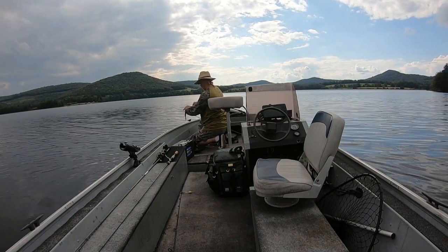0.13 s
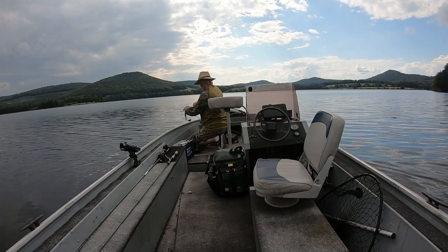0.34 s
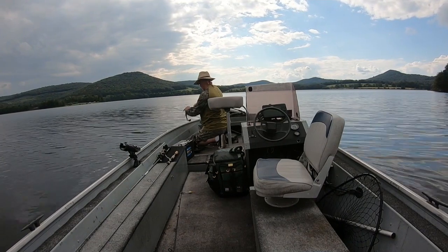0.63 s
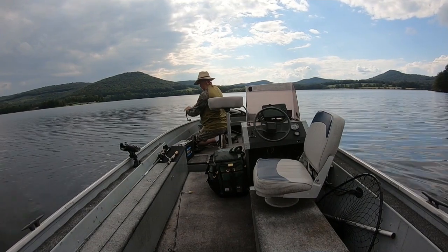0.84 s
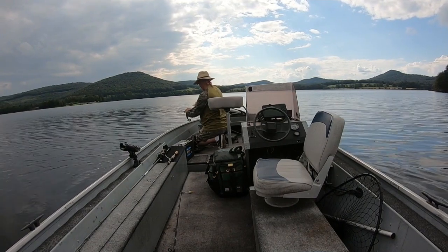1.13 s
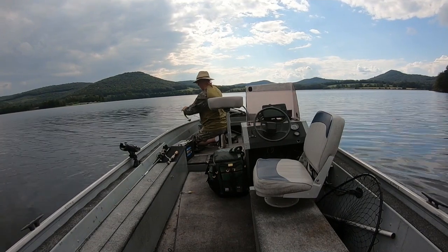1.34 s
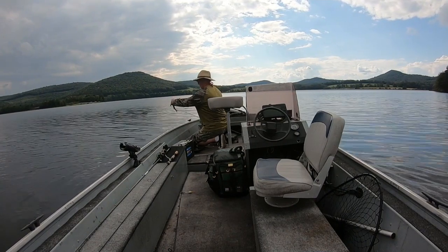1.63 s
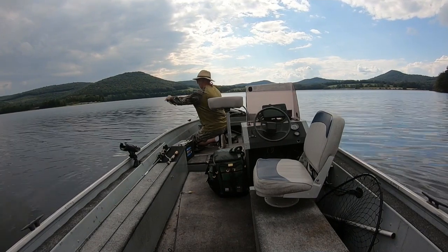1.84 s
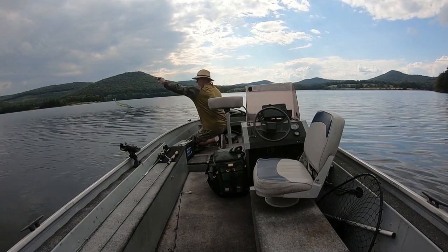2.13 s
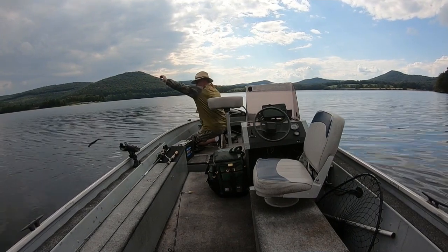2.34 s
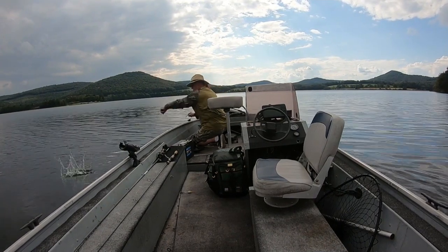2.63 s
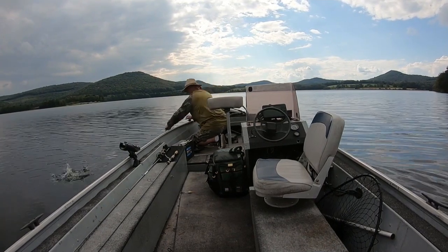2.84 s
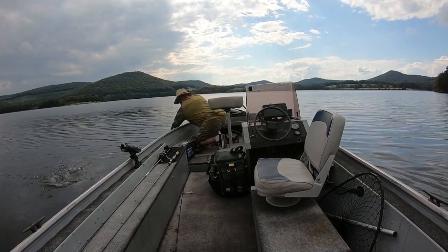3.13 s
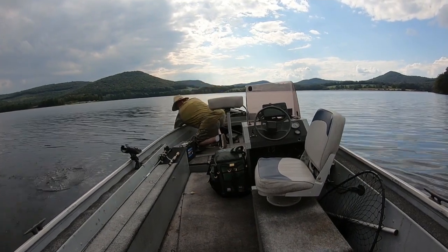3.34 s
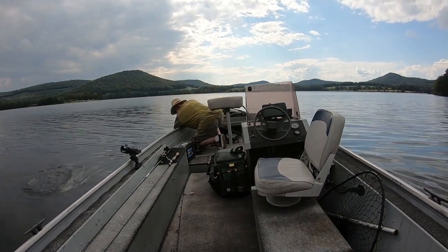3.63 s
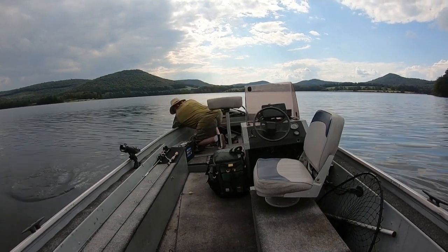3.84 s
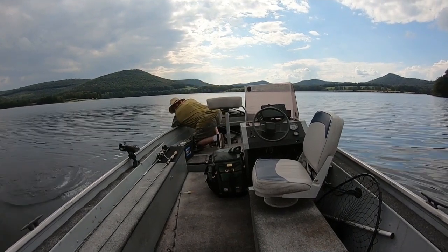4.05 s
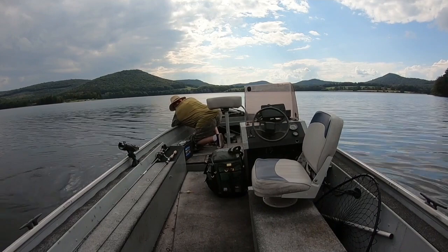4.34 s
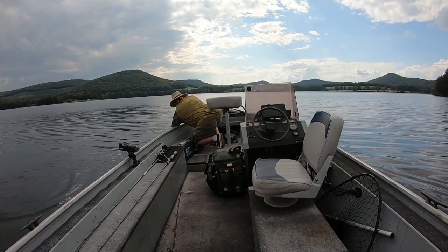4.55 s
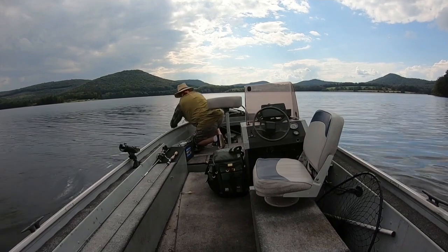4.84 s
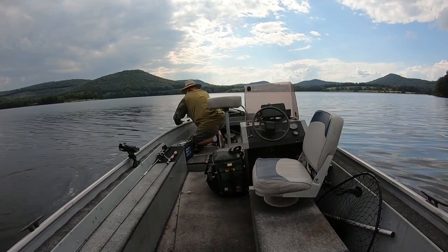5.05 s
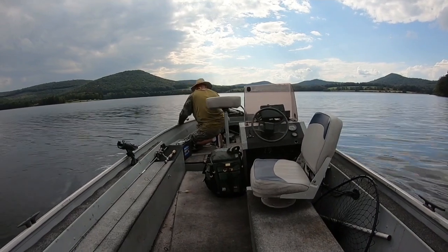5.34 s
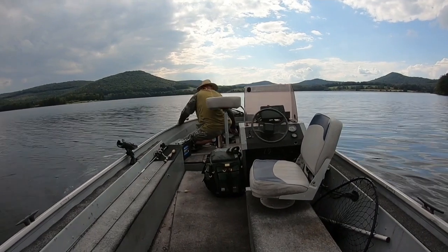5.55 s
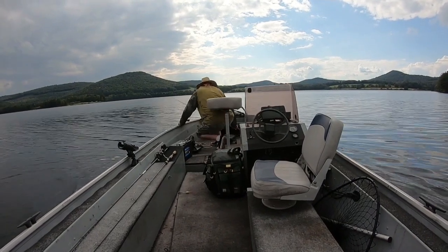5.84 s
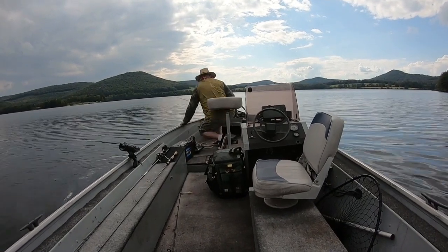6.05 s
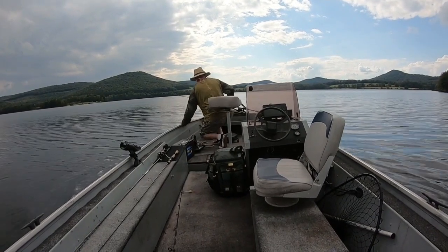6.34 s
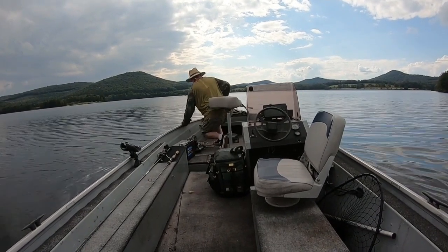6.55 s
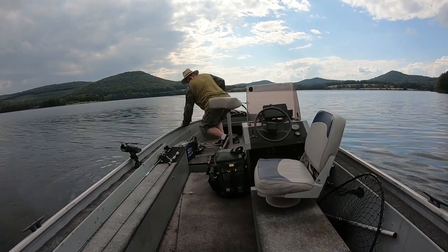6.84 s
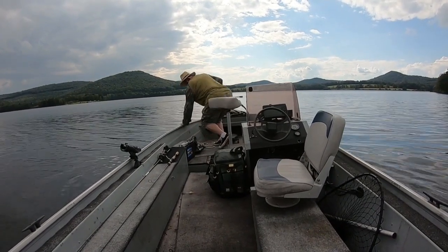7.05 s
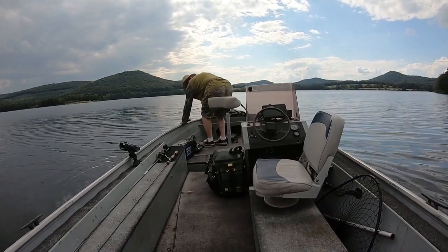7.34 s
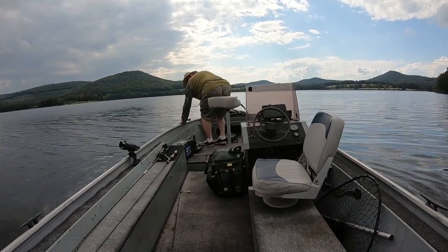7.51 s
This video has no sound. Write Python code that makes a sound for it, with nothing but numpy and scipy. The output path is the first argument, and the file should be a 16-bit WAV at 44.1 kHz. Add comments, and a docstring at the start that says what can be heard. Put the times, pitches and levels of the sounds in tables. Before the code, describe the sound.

A fish splashes back into a calm lake beside a small metal boat, then hands swish, feet thud, tackle clinks and an engine drones closer.

```python
"""On a calm lake, in a small metal boat, a fish is thrown back: sharp cracks, ringing bubbles and hissing spray.
Hands are rinsed over the side in gliding bubbles, then feet and tackle thud, scrape and clink as damped tones
and rough noise. Ripples ring the hull side and lap as shaped noise, and a breeze buffets the microphone ports.
A far hum of one tone fades, an engine drones nearer as a stack of tones, and shore insects are two noise bands."""
import sys
import numpy as np
from scipy import signal
from scipy.fft import rfft, irfft, next_fast_len
from scipy.io import wavfile
from scipy.ndimage import map_coordinates

SR = 44100
rng = np.random.default_rng(int(sys.argv[2]) if len(sys.argv) > 2 else 0)


def unload_audio(sound):
    """Save the sound as a 16-bit wav file, at the path given as the first command line argument."""
    columns = np.transpose(np.atleast_2d(sound))
    # keep every value between -1 and 1, then stretch to whole-number steps
    steps = np.round(np.clip(columns, -1, 1) * 32767)
    wavfile.write(sys.argv[1], SR, steps.astype(np.int16))


N = 338688
T = np.arange(N) / SR  # the time of every sample, in seconds


def amp(db):
    """Turn decibels into a plain multiplier."""
    return np.exp(np.asarray(db) * np.log(10) / 20)


def unit(x):
    """Scale a sound to an rms of 1."""
    return x / np.sqrt(np.mean(x ** 2) + 1e-20)


def along(points, hz):
    """Read a curve of (pitch_hz, value) points on a log pitch axis."""
    pitch_hz, value = np.transpose(points)
    return np.interp(np.log(hz + 1), np.log(pitch_hz + 1), value)


def curves(rows):
    """Give one value per sample for each column after the time."""
    time_s, *columns = np.transpose(rows)
    return [np.interp(T, time_s, column) for column in columns]


def wobble(rate):
    """A smooth random curve with the given number of random points a second."""
    points = rng.standard_normal(int(N * rate / SR) + 4)
    coarse_time = T[::32]
    return np.interp(T, coarse_time, map_coordinates(points, [coarse_time * rate]))


def filtered(x, response):
    """Multiply the spectrum of x by a response, which may shift phase too."""
    size = next_fast_len(N + SR // 2)  # spare room so that the end does not wrap to the start
    return irfft(rfft(x, size) * response(np.fft.rfftfreq(size, 1 / SR)), size)[..., :N]


def coloured(x, spectrum):
    """Shape x with a spectrum that is silent beyond both ends, rms 1."""
    lowest_hz, highest_hz = .7 * spectrum[0][0], 1.3 * spectrum[-1][0]
    inside = lambda hz: (hz > lowest_hz) & (hz < highest_hz)
    return unit(filtered(x, lambda hz: amp(along(spectrum, hz)) * inside(hz)))


def band(x, lo_hz, hi_hz):
    """A steep band-pass that never sounds ahead of its input, rms 1."""
    sos = signal.butter(3, [lo_hz, min(hi_hz, 18000)], "band", fs=SR, output="sos")
    return unit(signal.sosfilt(sos, x))


def pair(alike):
    """Two white noises, left and right; alike is their correlation."""
    a, b = rng.standard_normal((2, N))
    turn = np.arccos(np.clip(alike, -1, 1)) / 2
    shared, different = np.cos(turn) * a, np.sin(turn) * b
    return np.array([shared + different, shared - different])


def panned(x, pan_db):
    """Place a sound: pan_db is how much louder the left is than the right."""
    return np.array([x * amp(pan_db / 2), x * amp(-pan_db / 2)])


def add(out, start_s, sound):
    """Mix a sound in at its start time, cut at the end of the scene."""
    part = out[:, round(start_s * SR):][:, :sound.shape[1]]
    part += sound[:, :part.shape[1]]


def bubble(t, hz, t60, rise, attack):
    """A tone that swells in, loses 60 dB per t60 and can glide, as a shrinking air pocket climbs in pitch."""
    tone = np.sin(2 * np.pi * hz * t * (1 + rise * t / t60))
    return tone * amp(-60 * t / t60) * (1 - np.exp(-t / attack))


def drops(count, size, hz, spread, cycles, rise, size_db):
    """A steady rain of bubbles of mixed pitch and size, each size samples long, rms 1."""
    start, t = rng.random((count, 1)), np.arange(size) / SR
    pitch = np.clip(hz * np.exp(spread * rng.standard_normal((count, 1))), 400, 14000)
    loudness = amp(size_db * np.minimum(rng.exponential(size=(count, 1)), 3))
    grain = loudness * bubble(t, pitch, cycles / pitch, rise, 1.2 / pitch)
    grain = grain * np.cos(np.pi / 2 * t / t[-1])  # fade to silence at the end of each drop
    where = (start * N).astype(int) + np.arange(size)
    return unit(np.bincount(where.ravel(), grain.ravel(), N)[:N])


def swells(start, rise, hold, fall, *levels_db):
    """Events that gain 20 dB per rise time, hold, and lose 20 dB per fall time; one summed gain per level column."""
    late = T - start[:, None]
    before, after = -late / np.c_[rise], (late - np.c_[hold]) / np.c_[fall]
    shape = amp(-20 * np.maximum(np.maximum(before, after), 0))
    return amp(levels_db) @ shape


# Small sharp contacts of water and tackle: start_s, level_db, pitch_hz, edge_db (bright edge), pan_db (+ is left)
CONTACTS = [(1.3753, -51.5, 1370, -32, -11), (1.9608, -44, 1240, -25, -7), (1.9883, -43, 1900, -18, -4),
            (2.564, -24, 1900, -10, 2.5), (2.5714, -28.5, 3150, -5.5, -1), (2.5764, -32, 2340, -21, -2),
            (2.591, -23.5, 1740, -40, 3), (2.6024, -36.5, 1120, -35, 9), (2.6787, -35, 1640, -21, 5),
            (2.7075, -28.5, 3220, -26, 2), (2.7736, -50, 3470, -21, 4), (2.847, -52, 3560, -14, 0),
            (2.9097, -46, 3150, -30, 1), (2.9331, -39, 2970, -29, 4), (2.9594, -40, 2770, -9, 0.5),
            (2.993, -49, 1270, -14, 13), (3.005, -43, 2320, -26, 3), (3.0339, -51, 2520, -26, 7),
            (3.0843, -43, 3590, -25, 2), (3.1242, -41, 1850, -10, -2), (3.6211, -45.5, 2080, -10, -6),
            (3.7044, -48, 1240, -29.5, -3), (3.919, -46, 1230, -27, -5), (3.9857, -43, 1280, -33, -6),
            (3.897, -50, 2210, -35, -8), (4.0217, -44, 2120, -37, -1), (4.1983, -43.5, 1390, -35, -5),
            (4.2836, -47, 1250, -23, 10), (4.3295, -34, 1430, -23, 2.5), (4.3853, -45.5, 1220, -35, -11),
            (4.736, -39, 1590, -38, -4), (4.752, -50, 1500, -38, -3), (4.771, -43, 1500, -40, -5),
            (4.7925, -31, 2130, -21, -3), (5.2608, -47, 1750, -31, -1), (5.2773, -42.5, 2120, -30, -2),
            (5.3382, -44.5, 1900, -22, -9), (5.4983, -37, 1790, -40, -9), (5.5632, -51, 3180, -27, -7),
            (5.9483, -45, 4340, -11, -1), (5.9757, -43, 1780, -14, -2.5), (6.1488, -49, 3400, -33, -2),
            (6.2157, -38, 1370, -21, -2), (6.2456, -31.5, 1660, -16, -3.5), (6.4264, -53, 4280, -28, -1),
            (6.4761, -47.5, 3520, -40, -2), (6.563, -44.5, 1700, -31, -1), (7.436, -43, 1400, -14, -16),
            (7.4673, -43, 1460, -13, -1), (7.613, -43, 1570, -40, -4)]
TICK_T60_S = 0.02
LONGER_DB, LOUD_DB = 0.26, -26.5  # ring time gained, in dB, for each dB that a tick lies under LOUD_DB


def ticks():
    """Each small contact is a noisy crack, a short ring and a bright edge that differs at the two ports."""
    out, t = np.zeros((2, N)), np.arange(SR // 16) / SR
    for start_s, level_db, hz, edge_db, pan_db in CONTACTS:
        t60 = TICK_T60_S * amp(LONGER_DB * max(LOUD_DB - level_db, 0))
        burst = rng.standard_normal((3, len(t)))
        fast, slow = amp(-120 * t / t60), amp(-30 * t / t60)
        ring = bubble(t, hz, t60, 0.099, 0.00023)
        crack = band(burst[0], 0.36 * hz, 1.66 * hz) * (fast + 0.33 * slow)
        edge = band(burst[1] + 2.7 * burst[1:], 4500, 9600) * (fast + 0.1 * slow)
        edge = amp(edge_db) * edge * amp([[-1.5], [1.5]])
        add(out, start_s, panned(amp(level_db), pan_db)[:, None] * (0.42 * ring + 0.33 * crack + edge))
    return out


# Trapped pockets of air: start_s, level_db, pitch_hz, t60_s (time to fade 60 dB), pan_db (+ is left)
AIR_POCKETS = [(1.962, -48.5, 462, 0.12, -4), (2.564, -34, 620, 0.02, 3), (2.6495, -24.5, 547, 0.052, 3),
               (2.657, -29.5, 521, 0.05, 2), (2.68, -26, 473, 0.03, 1), (2.803, -38, 675, 0.034, 2),
               (2.817, -36.5, 308, 0.038, -1.0), (2.935, -48.5, 780, 0.06, -1), (2.96, -39, 920, 0.038, 6),
               (2.993, -40, 770, 0.025, 6), (3.772, -45, 480, 0.043, 4), (3.972, -43, 396, 0.11, 2.5),
               (4.034, -46.5, 692, 0.08, 4), (4.063, -47, 468, 0.11, -2), (4.305, -52, 704, 0.054, -3),
               (4.384, -47, 450, 0.038, -6), (4.587, -38.5, 362, 0.082, -3.5),
               (4.665, -52.5, 710, 0.033, -3), (4.74, -44.5, 454, 0.19, -2.5), (5.263, -44, 430, 0.1, -2),
               (5.573, -41.5, 452, 0.074, -7), (5.596, -36, 357.5, 0.12, 1.0), (5.669, -44, 376, 0.064, -3),
               (5.924, -44, 469, 0.18, -1.5), (6.248, -34.5, 463, 0.023, -1.5),
               (6.547, -45, 617, 0.19, -1.5), (6.569, -45, 377, 0.11, 0), (6.619, -40.5, 359, 0.1, -3)]


def glugs():
    """Each trapped pocket of air rings with two neighbours, the lower one swelling softly, and a dull slap."""
    out, t = np.zeros((2, N)), np.arange(SR // 8) / SR
    chances = rng.standard_normal((len(AIR_POCKETS), 2))
    for (start_s, level_db, hz, t60, pan_db), chance in zip(AIR_POCKETS, chances):
        main = 1.27 * bubble(t, hz, t60, 0.13, 0.00066)
        lower = 1.27 * bubble(t, hz * (.76 + 0.035 * chance[0]), t60, 0.17, 0.014)
        upper = 0.42 * bubble(t, hz * (1.1 + 0.035 * chance[1]), 0.82 * t60, 0.12, 0.0015)
        slap = band(rng.standard_normal(len(t)), 180, 1.43 * hz)
        slap = slap * amp(-60 * t / (1.95 * t60)) * (1 - np.exp(-t / 0.00048))
        add(out, start_s, panned(amp(level_db) * (main + lower + upper + 0.29 * slap), pan_db))
    return out


# Rising bubbles: start_s, level_db, start_pitch_hz, t60_s, pitch_rise (share of the start pitch)
RISING_BUBBLES = [(2.755, -46, 1090, 0.045, 0.32), (3.2, -47, 1610, 0.065, 1.2),
                  (3.78, -46, 640, 0.066, 1.2), (4.241, -45.5, 1450, 0.053, 0.93),
                  (5.286, -43.5, 1430, 0.035, 1.6), (5.589, -47, 1050, 0.067, 0.8),
                  (5.666, -40, 550, 0.056, 2.16)]


def rising_bubbles():
    """A rising bubble chirps upward in one pure gliding tone and is gone after half its t60."""
    out, t = np.zeros((2, N)), np.arange(SR // 8) / SR
    for start_s, level_db, hz, t60, rise in RISING_BUBBLES:
        fade = np.cos(np.pi / 2 * np.minimum(2 * t / t60, 1))
        add(out, start_s, panned(amp(level_db) * bubble(t, hz, t60, rise, 0.0025) * fade, 2.8))
    return out


# Showers of water: peak_s, rise_s and fall_s (per 20 dB), drops_db, mist_db
SHOWERS = [(2.565, 0.0069, 0.036, -54, -57), (2.68, 0.064, 0.031, -48.5, -55),
           (2.85, 0.31, 0.094, -59, -63.5), (2.915, 0.023, 0.18, -50, -53.5), (3.03, 0.12, 0.14, -65, -59),
           (3.095, 0.18, 0.23, -57.5, -59.5), (3.27, 0.09, 3.1, -80, -70)]
# Tone of fine mist and grit: pitch_hz, level_db (relative)
FINE_TONE = [(3000, -23), (5000, -17), (8000, -25), (10500, -16.5), (12000, -45), (14500, -19)]


def spray():
    """Thrown water rains back as crackling drops over a wet hiss, and a finer mist."""
    peak_s, rise, fall, *levels_db = np.transpose(SHOWERS)
    heavy, light = swells(peak_s, rise, 0, fall, *levels_db)
    crackle = drops(count=3200, size=250, hz=2940, spread=0.48, cycles=17, rise=0.33, size_db=7)
    wet = 0.74 * crackle + 0.28 * band(pair(0.96), 2300, 4400)
    fine = np.array([drops(count=3000, size=60, hz=8700, spread=0.36, cycles=8.3, rise=0.13, size_db=4)
                     for port in "LR"])
    mist = 0.35 * fine + 0.41 * coloured(pair(.2), FINE_TONE)
    return heavy * wet + light * mist * amp([[-2.5], [2.5]])


# Stirred water: peak_s, rise_s and fall_s (per 20 dB), big_bubbles_db, small_bubbles_db
STIRS = [(3.02, 0.25, 0.55, -62, -63.5), (3.26, .3, 0.048, -61, -72), (3.8, 0.26, 0.062, -61.5, -74),
         (4.066, 0.42, 0.05, -62, -65), (4.3, 0.19, 0.12, -88, -59.5), (5.196, 0.0089, 0.073, -63, -93),
         (5.32, 0.046, 0.52, -67, -74)]
# Tone of rough noise, in stirred water and in scrapes: pitch_hz, level_db (relative)
COARSE_TONE = [(500, -1), (1000, -11.5), (1800, 8), (3000, -1.5), (5000, -13), (7000, -25)]


def gurgle():
    """Stirred water lets go of bubbles whose pitch glides up, the small ones mixed with rough noise."""
    peak_s, rise, fall, *levels_db = np.transpose(STIRS)
    deep, light = swells(peak_s, rise, 0, fall, *levels_db)
    big = drops(count=450, size=1300, hz=704, spread=0.3, cycles=33, rise=0.27, size_db=4)
    small = drops(count=2200, size=500, hz=1790, spread=0.306, cycles=27, rise=0.37, size_db=4.5)
    small = small + 0.76 * coloured(pair(0.47), COARSE_TONE)
    return (deep * big + light * small) * amp([[.8], [-.8]])


# Weight shifting on the floor: start_s, level_db, pitch_hz, t60_s
FLOOR_THUDS = [(2.797, -39, 163, 0.11), (4.738, -25, 81.9, 0.29), (4.768, -25.5, 56.5, 0.2),
               (5.389, -41, 68, 0.39), (5.951, -35, 92, 0.21), (6.044, -32, 70, 0.19),
               (6.247, -26.5, 54, 0.26), (6.29, -35.5, 81.6, 0.28), (6.439, -35.5, 76.3, 0.27),
               (6.499, -27.5, 73, 0.091), (7.104, -35.5, 62, 0.14)]


def thuds():
    """Weight shifts flex the floor: a soft low push with a higher panel mode."""
    out, t = np.zeros((2, N)), np.arange(SR // 2) / SR
    for start_s, level_db, hz, t60 in FLOOR_THUDS:
        push = bubble(t, hz, t60, -0.05, 0.0047)
        panel = 0.3 * bubble(t, 2.3 * hz, 0.56 * t60, 0, 0.0062)
        add(out, start_s, panned(amp(level_db) * (push + panel), 0))
    return out


# Shoes and cloth dragging: start_s (of the hold), hold_s, fall_s (per 20 dB), drag_db, fine_grit_db
DRAGS = [(1.956, 0.0089, 0.08, -63, -86), (2.1, .03, .02, -80, -74), (4.788, 0.073, .02, -56.5, -74),
         (5.962, 0.22, .1, -69.5, -73), (6.268, .01, 0.19, -64, -76), (6.566, 0.12, .02, -68, -100),
         (7.092, 0.069, .02, -64, -89), (7.43, 0.047, .035, -60.5, -70)]
SCRAPE_RISE_S = 0.035  # per 20 dB


def scrapes():
    """Shoes and cloth drag briefly over the floor: noise with a rough grain, coarse and fine."""
    start_s, hold, fall, *levels_db = np.transpose(DRAGS)
    drag, grit = swells(start_s, SCRAPE_RISE_S, hold, fall, *levels_db)
    grains = pair(1.0) * amp(1.3 * wobble(300))
    return (drag * coloured(grains, COARSE_TONE) + grit * coloured(grains, FINE_TONE)) * amp([[-1.5], [1.5]])


# Loose tackle touching metal: start_s, level_db, tilt_db (per octave; + is brighter)
TOUCHES = [(5.9489, -65, -3), (5.9768, -57, 4), (5.9944, -64, 8), (6.1479, -54.5, -1), (6.2457, -56, 7),
           (6.2961, -57, -1), (6.3076, -62, 10), (6.4263, -60, 4), (6.4844, -65, 4)]
# Ringing tones of the tackle: pitch_hz, level_db, t60_s
TACKLE_TONES = [(1840, 2.5, 0.069), (2570, -20, .04), (3570, 3, 0.05), (4530, -1, 0.034), (5050, -7, 0.057),
                (5100, -11, 0.041)]


def clinks():
    """Each touch rings the same small metal modes at new strengths."""
    out, t = np.zeros((2, N)), np.arange(SR // 8) / SR
    chances = rng.standard_normal((len(TOUCHES), len(TACKLE_TONES)))
    for (start_s, level_db, tilt_db), chance in zip(TOUCHES, chances):
        ring = 0
        for (hz, tone_db, t60), c in zip(TACKLE_TONES, chance):
            strength = amp(tone_db + 4.9 * c + tilt_db * np.log2(hz / 4500))
            ring = ring + strength * bubble(t, hz, t60, 0, 0.00044)
        add(out, start_s, panned(amp(level_db) * ring, -1.0))
    return out


# Ripples slapping the right side: start_s, level_db, best_pitch_hz (the pitch driven most)
RIPPLE_SLAPS = [(0.714, -39, 526), (1.374, -52.5, 700), (2.164, -36.5, 550), (5.2, -40, 626),
                (5.339, -33.5, 584), (5.498, -48.5, 530), (6.404, -37, 790), (7.488, -29, 840)]
# Ringing tones of the hull side: pitch_hz, level_db, t60_s
HULL_TONES = [(290, 13, 0.1), (477, 4, 0.042), (537, 1, 0.049), (623, -7, 0.098), (758, 8.5, 0.039),
              (875, 2, 0.03), (1100, -11, 0.042), (1280, -8, .03)]
REACH_DB, KNOCK_PAN_DB = 17.5, -11.5  # loss of a mode one octave from the best pitch; - is right


def knocks():
    """Each slap rings the hull side, most at the modes near its own pitch."""
    out, t = np.zeros((2, N)), np.arange(SR // 8) / SR
    chances = rng.standard_normal((len(RIPPLE_SLAPS), len(HULL_TONES)))
    for (start_s, level_db, best_hz), chance in zip(RIPPLE_SLAPS, chances):
        ring = 0
        for (hz, tone_db, t60), c in zip(HULL_TONES, chance):
            strength = amp(tone_db + 2.7 * c - REACH_DB * np.log2(hz / best_hz) ** 2)
            ring = ring + strength * bubble(t, hz * (1 + .02 * c), t60, 0, 0.0019)
        slap = band(rng.standard_normal(len(t)), 130, 1.65 * best_hz)
        slap = slap * amp(-60 * t / 0.069) * (1 - np.exp(-t / 0.0016))
        add(out, start_s, panned(amp(level_db) * (0.67 * ring + 0.24 * slap), KNOCK_PAN_DB))
    return out


def ports(left, right):
    """Two close ports hear the bass alike; higher up their difference is lifted and shifted."""
    lift = lambda hz: 1.5 * (1j * hz / 450) ** 2 / (1 + 1j * hz / 450) ** 2
    wide = filtered((left - right) / 2, lift)
    return (left + right) / 2 + np.array([wide, -wide])


# Echoes from the hull sides: delay_s, level_db
HULL_ECHOES = [(.0035, -20.5), (.007, -14.5), (.016, -15.5), (0.026, -22.5)]


def hull_echoes(near):
    """The hull sides send back a few fainter, later copies."""
    echo = lambda hz: 1 + sum(amp(db) * np.exp(-2j * np.pi * hz * delay_s) for delay_s, db in HULL_ECHOES)
    return filtered(near, echo)


# Water against the hull over time: time_s, boom_db, lapping_db
SWELL_LEVEL = [(0.0, -60, -55.5), (0.58, -62, -58.5), (1.09, -50.5, -56), (1.77, -63.5, -56.5),
               (2.27, -52.5, -55), (2.97, -56, -52), (3.31, -55.5, -54), (3.57, -46, -57.5),
               (4.45, -63.5, -56.5), (4.88, -52, -52.5), (5.24, -57.5, -54), (5.41, -55.5, -52.5),
               (5.88, -61, -52), (6.18, -54, -49.5), (6.91, -59.5, -53), (7.68, -54, -53)]
# Tone of the hull boom: pitch_hz, level_db (relative)
BOOM_TONE = [(32, -23), (55, -6.5), (89, 6), (101, 0), (124, -13), (135, -17), (180, -55), (300, -120)]
# Tone of the lapping: pitch_hz, level_db (relative)
LAPPING_TONE = [(74, -11), (125, -0.5), (157, 3.5), (204, -2.5), (308, -7.5), (348, -10), (457, -17.5),
                (490, -33.5), (800, -26), (1040, -71), (1760, -120)]


def lapping():
    """Ripples lap at the hull, which booms in lumps: two low noises of uneven level."""
    boom_db, lap_db = curves(SWELL_LEVEL)
    boom = amp(boom_db + 2.65 * wobble(13)) * coloured(pair(1.0), BOOM_TONE)
    laps = amp(lap_db + 2.64 * wobble(12)) * coloured(pair(0.95), LAPPING_TONE)
    return boom + laps


# Heaving of the boat over time: time_s, level_db
ROCKING_LEVEL = [(0.0, -53), (0.7, -62), (0.85, -77), (6.14, -68), (6.27, -40), (6.46, -42.5), (6.54, -65),
                 (7.42, -41), (7.68, -61)]
# Tone of the heaving: pitch_hz, level_db (relative)
HEAVE_TONE = [(8, -9.5), (14, 0), (20, 2), (26, -24)]


def rocking():
    """A rumble at the edge of hearing as the boat heaves, unlike at the two ports."""
    level_db, = curves(ROCKING_LEVEL)
    return amp(level_db) * coloured(pair(.4), HEAVE_TONE) * amp([[-3], [3]])


# Breeze over time: time_s, level_db
BREEZE_LEVEL = [(0.0, -42.5), (0.3, -59), (0.58, -61.5), (0.72, -54), (0.9, -72), (1.45, -62), (2.01, -75),
                (3.44, -59), (4.3, -78), (4.79, -54), (5.71, -64), (6.3, -51.5), (6.8, -67), (7.68, -58)]
# Tone of the buffeting: pitch_hz, level_db (relative)
BUFFET_TONE = [(22, -37), (33, -5), (42, -4.5), (58, -3.5), (75, -23)]
VEER_DB = (5, -6)  # the breeze swings from the left port to the right


def breeze():
    """Wind on the ports buffets them with deep, unsteady noise."""
    level_db, = curves(BREEZE_LEVEL)
    gusts = panned(amp(level_db + 4.2 * wobble(9.7)), np.linspace(*VEER_DB, N))
    return gusts * coloured(pair(0.97), BUFFET_TONE)


# Engine loudness over time: time_s, level_db
ENGINE_LEVEL = [(0, -88), (5, -69.5), (6.8, -59.5), (7.68, -57.5)]
# Tones of the engine: multiple (of the base pitch), level_db
ENGINE_TONES = [(2, -10), (3, -1.5), (4, -7), (5, -4.5), (6, -8), (7, -10.5), (8, -12)]
ENGINE_BASE_HZ, FLUTTER_DB = 76.8, 2.5


def engine():
    """A far engine draws nearer; each of its tones flutters on its own way through the air."""
    level_db, = curves(ENGINE_LEVEL)
    turns = 2 * np.pi * np.cumsum(ENGINE_BASE_HZ + 0.28 * wobble(3)) / SR
    drone = 0
    for multiple, tone_db in ENGINE_TONES:
        drone = drone + amp(tone_db + FLUTTER_DB * wobble(3.6)) * np.sin(multiple * turns)
    return amp(level_db) * drone


# Far hum over time: time_s, level_db
HUM_LEVEL = [(0.0, -52.5), (0.35, -67.5), (0.95, -57.5), (1.6, -52.5), (2.0, -66.5), (2.17, -54.5),
             (3.6, -61), (3.7, -84)]
HUM_START_HZ, HUM_SAG_HZ_PER_S = 258, 2.4


def hum():
    """A far, slightly unsteady tone that sags and fades."""
    level_db, = curves(HUM_LEVEL)
    hz = HUM_START_HZ - HUM_SAG_HZ_PER_S * T + 2.14 * wobble(8)
    return amp(level_db + 0.64 * wobble(2.6)) * np.sin(2 * np.pi * np.cumsum(hz) / SR)


# Tone of the insect chorus: pitch_hz, level_db (relative)
CHORUS_TONE = [(1530, -61), (2600, -17), (3000, -4), (3120, -1), (3370, 3), (3600, 0.5), (3840, -24),
               (4290, -24), (4740, -14), (5500, -16), (6300, 0), (6930, 3.5), (7380, -7), (7850, -14.5),
               (8200, -18), (10700, -26.5), (18000, -120)]
# How far the right port leads the left in the chorus: pitch_hz, phase_radians
CHORUS_LEAD = [(3000, 0.78), (4200, 0.22), (5200, 1.46), (7500, 1.64)]
# Thin hiss over time: time_s, level_db
HISS_LEVEL = [(0.0, -67.5), (2.41, -68), (2.99, -61), (3.36, -69.5), (7.68, -60)]
# Tone of the thin hiss: pitch_hz, level_db (relative)
HISS_TONE = [(400, 3), (700, 3), (1450, 0.5), (2500, -6), (4200, -14.5), (8000, -31), (11000, -22),
             (11600, -46), (15500, -12.5)]
CHORUS_DB = -63  # middle level, before the two sides are balanced


def shore():
    """Many insects blur into two bands from the right, over a thin hiss unrelated between the ports."""
    hiss_db, = curves(HISS_LEVEL)
    sides = np.array([[-1], [1]])
    chorus = coloured(pair(1.0), CHORUS_TONE)
    chorus = filtered(chorus, lambda hz: np.exp(.5j * along(CHORUS_LEAD, hz) * sides))
    chorus = amp(CHORUS_DB + 0.46 * wobble(25)) * chorus * amp(3.2 * sides)
    hiss = amp(hiss_db) * coloured(pair(0.021), HISS_TONE) * amp(2.1 * sides)
    return chorus + hiss


def scene():
    """Add up every sound; the small close ones also echo off the hull."""
    near = ports(*(ticks() + glugs() + rising_bubbles() + knocks() + clinks()))
    splash = hull_echoes(near) + spray() + gurgle()
    feet = thuds() + scrapes()
    water_and_wind = lapping() + rocking() + breeze()
    return splash + feet + water_and_wind + engine() + hum() + shore()


# Tone of the microphone: pitch_hz, level_db
MIC_TONE = [(18, 1), (30, 4), (44, 0.5), (5000, 2), (9000, -3), (11000, -3), (13000, -2.5), (15500, -27)]
TOP_HZ = 15600


def record(dry):
    """The microphone lifts the deep bass, dulls the top octave and keeps nothing above its band limit."""
    return filtered(dry, lambda hz: amp(along(MIC_TONE, hz)) * (hz < TOP_HZ))


dry = scene()
out = record(dry)
unload_audio(out)
```